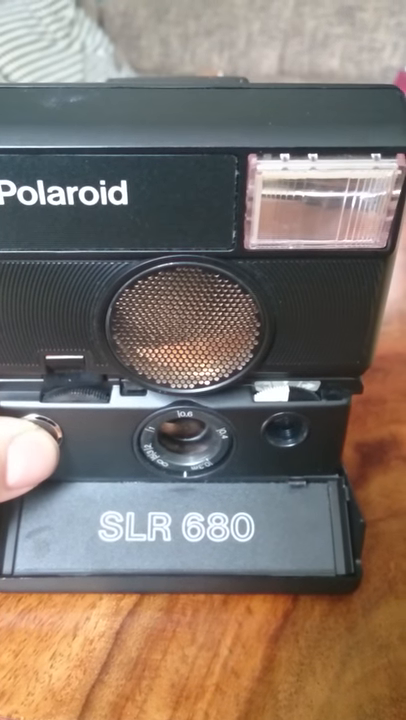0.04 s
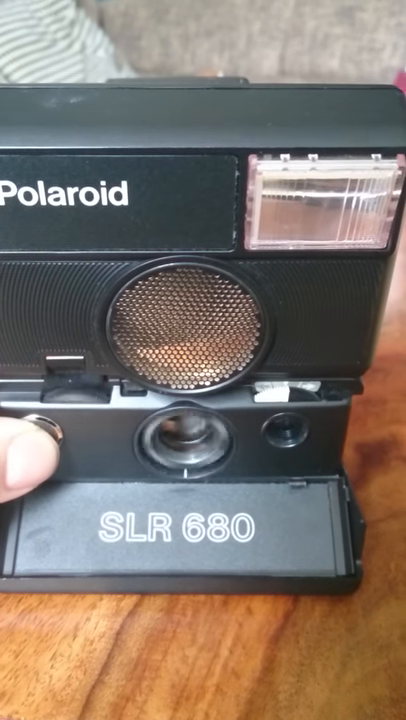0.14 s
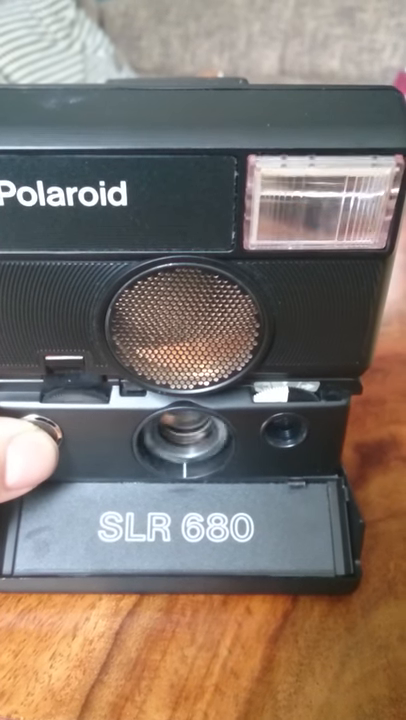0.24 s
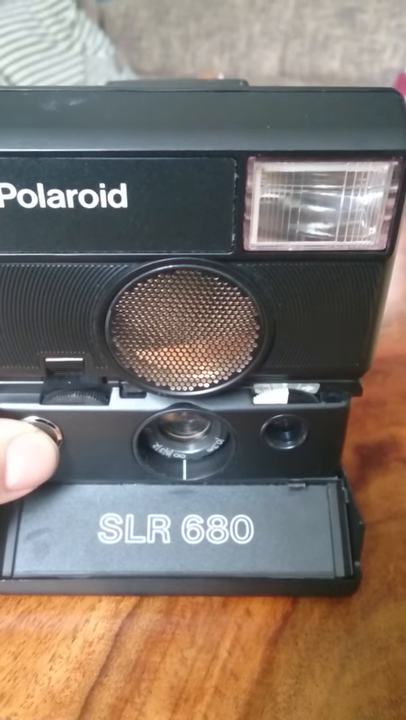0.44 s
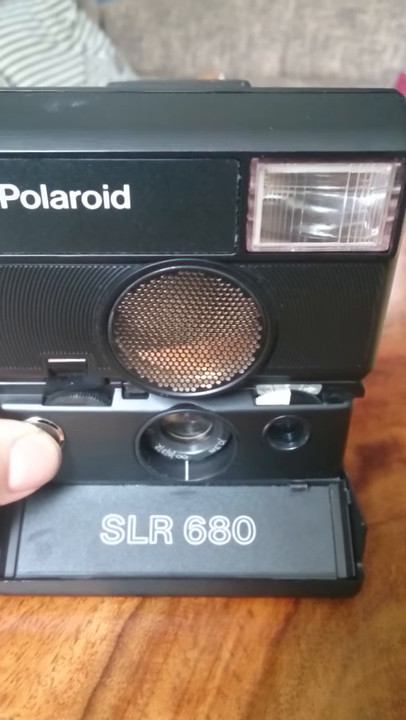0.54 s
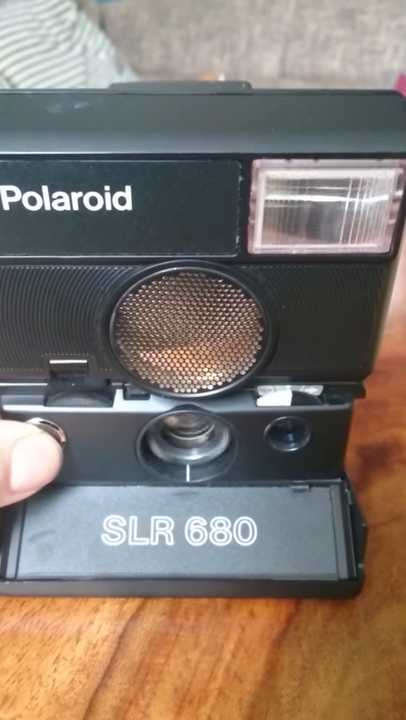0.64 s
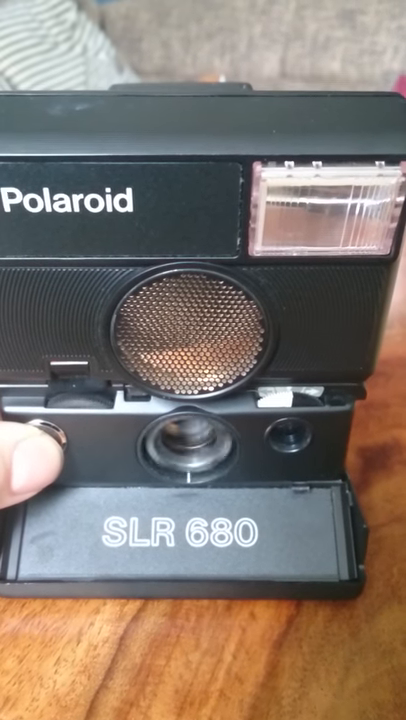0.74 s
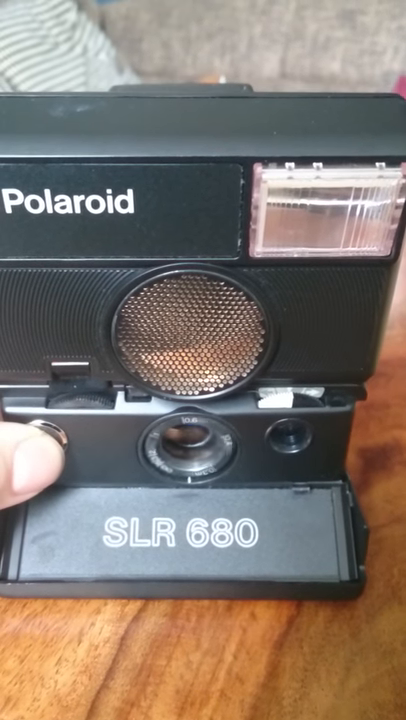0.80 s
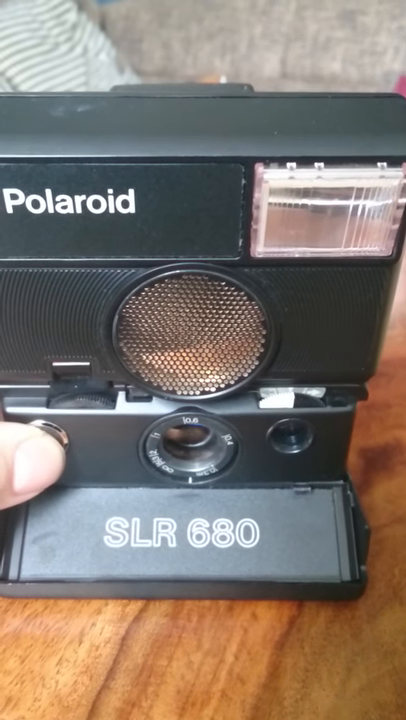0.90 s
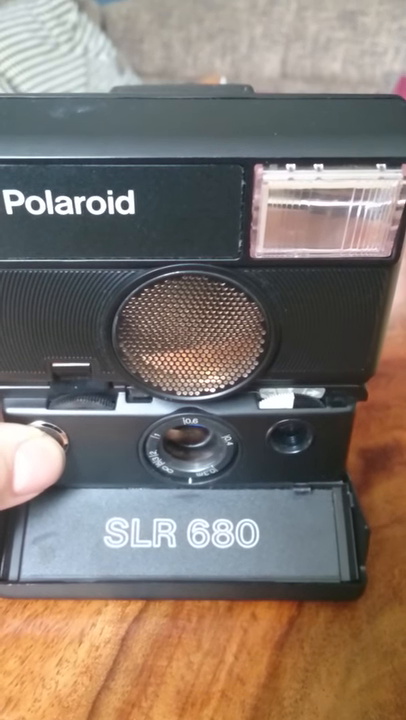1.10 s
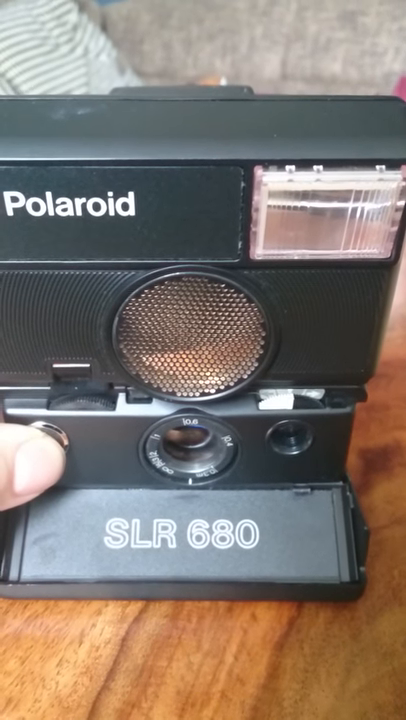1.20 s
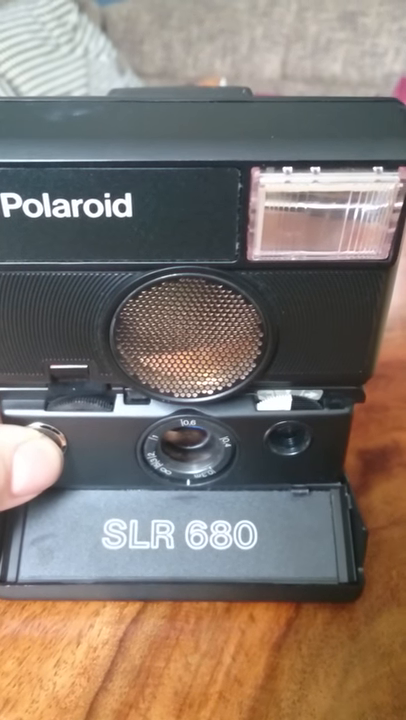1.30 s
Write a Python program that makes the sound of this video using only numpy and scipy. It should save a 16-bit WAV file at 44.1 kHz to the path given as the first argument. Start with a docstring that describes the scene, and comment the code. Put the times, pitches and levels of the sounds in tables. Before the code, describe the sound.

An instant camera's focus motor whirs twice, close by in a quiet room. After a very faint handling thump, the first rising, rattly whine runs from about 0.2 to 0.45 seconds, ending in clattering clicks and a faint ring. The shutter snaps at 0.65 seconds and the motor whirs back with two brief squeals. It stops with a sharp click at 0.9 seconds, followed by a small tick.

```python
"""A faint handling thump, then an instant camera's focus motor whirs the lens out and back, close by.
Meshing teeth make a rising whine over a rattle, and the gears squeal briefly on the way back.
Each run ends against a stop: the impact clatters, clicks and sets the case ringing in its modes.
The shutter snaps between the runs, and a quiet room answers with a short reverberation."""
import sys
import numpy as np
from scipy import signal
from scipy.fft import rfft, irfft, next_fast_len
from scipy.io import wavfile
from scipy.ndimage import map_coordinates

SR = 44100
rng = np.random.default_rng(int(sys.argv[2]) if len(sys.argv) > 2 else 0)


def int16_out(signal):
    """Quantize to a 16-bit WAV file."""
    q = np.round(np.clip(np.atleast_2d(signal).T, -1, 1) * 32767)
    wavfile.write(sys.argv[1], SR, q.astype(np.int16))


N = 59535
T = np.arange(N) / SR
SIDES = np.array([[.5], [-.5]])  # splits a difference between left and right
RUN_DOWN_S = 0.0078  # time constant of the stopping motor


def focus_motor():
    """A geared motor drives the lens out and back; its pitch is the rate at which teeth mesh."""
    # Each row: start and stop in seconds, rattle level in dB, rattle growth in dB per second.
    runs = [(.172, .452, -41, 10.5), (.645, .914, -43, -9)]
    # Motor speed, outward and back. Each row: time in seconds, tooth rate in Hz.
    speed_out = [(.172, 500), (.2, 880), (.245, 1035), (.29, 1108), (.325, 1132), (.385, 1126),
                 (.425, 1145)]
    speed_back = [(.645, 600), (.68, 850), (.735, 1000), (.76, 1075), (.8, 1113), (.835, 1152), (.87, 1150),
                  (.91, 1187)]
    # Rattle spectra, outward and back. Each row: frequency in Hz, relative density in dB.
    rattle_out = [(200, -40), (500, -30), (800, -10), (1100, -8.5), (1400, -8.5), (1800, -7.5), (2200, 1.5),
                  (2550, 0), (3000, 4.5), (4100, -7.5), (4900, -7.5), (5600, -1.5), (7000, -5), (8500, -10),
                  (13000, -16), (15300, -5.5)]
    rattle_back = [(200, -28), (500, -20.5), (800, -6), (1100, -1), (1400, -9), (1900, -7.5), (2400, -5),
                   (3050, 6.5), (3900, -7.5), (4900, -10.5), (5600, 4), (6300, -14), (7050, -0.5),
                   (8300, -12.5), (11500, -19.5), (15300, -12)]
    outward = gear_train(runs[0], speed_out, rattle_out, direction=0)
    return outward + gear_train(runs[1], speed_back, rattle_back, direction=1)


def gear_train(run, speed_curve, spectrum, direction):
    """Rattle and whine grow with speed, and each turn of the shaft modulates their amplitude."""
    start, stop = run[:2]
    flutter, sway_depth, teeth_per_turn, full_whine_hz = .004, 0.26, 12, 1157
    tooth_hz = np.interp(T, *np.transpose(speed_curve))
    speed = tooth_hz / tooth_hz.max()
    running = (T > start) * decay_after(stop, RUN_DOWN_S)
    teeth = np.cumsum(tooth_hz * (1 + flutter * wobble(170))) / SR
    shaft_angle = 2 * np.pi * teeth / teeth_per_turn
    sway = running * (1 + sway_depth * np.sin(shaft_angle))
    rattle = sway * speed ** 1.75 * tooth_rattle(teeth, run, spectrum)
    whine = sway * np.minimum(tooth_hz / full_whine_hz, 1) ** 9.7 * gear_whine(teeth, direction)
    whine *= decay_after(speed_curve[-1][0], RUN_DOWN_S)
    hum = amp(-76) * running * speed ** 2 * np.sin(4 * shaft_angle)
    return radiated(rattle, room_db=-4) + hum + whine + amp(-11.5) * room(whine)


def gear_whine(teeth, direction):
    """Periodic meshing gives harmonics; uneven tooth timing modulates their phase, blurring the top."""
    # Each row: harmonic number, outward and return levels in dB, left over right in dB,
    # left phase lead in radians.
    harmonics = [(1, -58, -54, 0, 4), (2, -37.5, -35, 0, 4.3), (3, -43.5, -46.5, 5.5, 6.9),
                 (4, -54, -59, 8, 9), (5, -52, -56, 13, 13.3), (6, -54, -57, 2, 15)]
    jitter_rad, flicker_db = 0.12, 3.3
    whine = np.zeros((2, N))
    for k, *levels, pan_db, lead in harmonics:
        phase = 2 * np.pi * k * teeth + jitter_rad * k * wobble(400) + lead * SIDES
        level_db = levels[direction] + flicker_db * wobble(60) + pan_db * SIDES
        whine += np.sqrt(2) * amp(level_db) * np.sin(phase)
    return whine


def tooth_rattle(teeth, run, spectrum):
    """Each tooth strikes with uneven force: a broadband impulse train over the noise of scraping."""
    # The gears catch. Each row: time in seconds, width in seconds, extra level in dB.
    catches = [(0.198, 0.016, 1), (0.273, 0.0036, 3), (0.421, 0.0021, 6), (0.674, 0.004, 0),
               (0.726, 0.0048, -1)]
    start, stop, rattle_db, growth_db_per_s = run
    scatter_db, scrape_db = 3, 1
    force = amp(scatter_db * rng.standard_normal(N).clip(-2, 2))
    ticks = np.diff(np.floor(teeth), prepend=0) * force * rng.choice([-1, 1], (3, N))
    scrape = amp(scrape_db) * rng.standard_normal((3, N))
    load_db = growth_db_per_s * (np.minimum(T, stop) - (start + stop) / 2)
    load_db += sum(db * bell(s, width) for s, width, db in catches)
    return amp(rattle_db + load_db) * coloured(unit(ticks) + scrape, spectrum)


def clicks():
    """Hard impacts at the latch and stops make small parts chatter in decaying bursts of noise."""
    # Each row: start in seconds, level in dB, rise and decay in seconds, tilt in dB per octave.
    contacts = [(.4348, -28.5, 0.0026, 0.0029, 3.5), (0.4425, -26.5, .001, 0.0029, 7),
                (0.449, -30, 0.0029, 0.0046, -3), (0.6395, -35, 0.00038, 0.0012, 2.5),
                (0.6486, -35.5, .002, 0.0031, -2.5), (.9134, -17, 0.0013, 0.0025, 0.5),
                (0.922, -39.5, 0.0034, 0.036, 1.5), (0.9894, -38, 0.0005, 0.0087, 6)]
    # Spectrum of the chatter. Each row: frequency in Hz, relative density in dB.
    spectrum = [(200, -71), (500, -29.5), (900, -8.5), (1600, -2.5), (2400, -1), (3300, 8.5), (4300, -6.5),
                (5600, 3), (7000, 3.5), (8500, -2), (10800, -11), (12700, -6), (15500, -5.5)]
    chatter = np.zeros((3, N))
    for s, db, rise, decay, tilt_db in contacts:
        envelope = np.clip((T - s) / rise, 0, 1) * decay_after(s + rise, decay)
        chatter += amp(db) * envelope * coloured(rng.standard_normal((3, N)), spectrum, tilt_db)
    return radiated(chatter, room_db=-10.5)


def shutter():
    """The blades snap in one dry knock; so short a pulse has a broad spectrum."""
    # Each row: frequency in Hz, width in seconds, level in dB.
    pulses = [(1821, .00018, -30.5), (800, 0.00013, -35.5)]
    snap_s, pan_db = .64155, -22.5  # left over right
    knock = low_cut(sum(push(snap_s, db, hz, width) for hz, width, db in pulses))
    return (direct(knock) + amp(-13) * room(knock)) * amp(pan_db * SIDES)


def squeaks():
    """The accelerating gears squeal in brief tones, roughened by random phase modulation."""
    # Each row: time in seconds, width in seconds, frequency in Hz, level in dB.
    squeals = [(0.673, 0.013, 2923, -39), (.722, 0.0083, 2880, -36)]
    direct_and_diffuse = np.zeros((3, N))
    for part in direct_and_diffuse:
        for s, width, hz, db in squeals:
            part += amp(db) * bell(s, width) * np.sin(2 * np.pi * hz * T + 0.84 * wobble(350))
    return radiated(direct_and_diffuse, room_db=-7)


def case_ring():
    """Struck as the lens hits a stop, the case vibrates freely in its damped modes."""
    # Each row: mode frequency in Hz, relative level in dB, time to fall 60 dB in seconds.
    modes = [(1020, 0, .29), (1505, -6, .24), (2250, -6, .2), (2680, -7, .15), (2880, -2, .17)]
    # Each row: time of impact in seconds, level in dB.
    stops = [(.447, -44.5), (0.912, -53)]
    rise_s = .001
    out = np.zeros(N)
    for s, db in stops:
        t = np.maximum(T - s, 0)
        for hz, level, t60 in modes:
            envelope = amp(db + level - 60 * t / t60) * (1 - np.exp(-t / rise_s))
            out += envelope * np.sin(2 * np.pi * hz * t + .3 * wobble(80))
    return out


def handling_thump():
    """A soft, slow push on the body holds only low frequencies."""
    return push(s=0.0637, db=-67.5, hz=75, width=0.015)


def radiated(direct_and_diffuse, room_db):
    """Direct sound reaches both sides, left first; diffuse sound, different on each side, widens it."""
    # Stereo balance. Each row: frequency in Hz, left over right in dB.
    balance = [(700, 2.5), (1290, 3.5), (2380, -5), (4400, 8), (8100, -0.5), (15000, 2)]
    pair = direct(direct_and_diffuse[0]) + amp(2) * direct_and_diffuse[1:]
    pair = filtered(pair, lambda hz: amp(along(balance, hz) * SIDES))
    pair = low_cut(low_cut(pair))
    return pair + amp(room_db) * room(pair)


def direct(x, lead_s=0.000458):
    """A shorter path brings the sound to the left microphone first."""
    return filtered(x, lambda hz: np.exp(2j * np.pi * hz * lead_s * SIDES))


def low_cut(x, cutoff_hz=420):
    """Parts much smaller than the wavelength radiate little bass."""
    return signal.sosfilt(signal.butter(2, cutoff_hz, "high", fs=SR, output="sos"), x)


def room(x):
    """Diffuse reflections form a noise tail whose treble dies soonest."""
    # Each row: frequency in Hz, reverberation time in seconds.
    t60 = [(300, 0.56), (1500, 0.44), (3000, 0.3), (7000, 0.29), (15000, 0.23)]
    hz, t, spectra = signal.stft(rng.standard_normal((2, SR // 2)), SR, nperseg=256)
    tail = signal.istft(spectra * amp(-60 * t / along(t60, hz)[:, None]), SR, nperseg=256)[1]
    tail *= 1 - np.exp(-np.arange(tail.shape[1]) / SR / 0.0016)  # the reflections build up
    tail /= np.linalg.norm(tail, axis=1, keepdims=True)
    return signal.fftconvolve(np.atleast_2d(x), tail, axes=1)[:, :N]


def noise_floor():
    """The quiet room is steady noise, strongest in the bass and uncorrelated between the sides."""
    # Each row: frequency in Hz, relative density in dB.
    spectrum = [(15, -46.5), (25, -14.5), (38, -15), (80, -8.5), (149, -19), (309, -22), (394, -19.5),
                (695, -24.5), (818, -25.5), (1740, -24), (5430, -31), (8830, -28.5), (16000, -43.5)]
    return amp(-69 + 0.71 * SIDES) * coloured(rng.standard_normal((2, N)), spectrum)


def amp(db):
    return 10 ** (np.asarray(db) / 20)


def unit(x):
    return x / np.sqrt(np.mean(x ** 2) + 1e-20)


def along(points, hz):
    """Interpolates (Hz, value) points on a logarithmic frequency axis."""
    f, v = np.transpose(points)
    return np.interp(np.log(hz + 1), np.log(f + 1), v)


def wobble(rate):
    """A smooth random curve with rate knots a second."""
    return map_coordinates(rng.standard_normal(int(N * rate / SR) + 4), [T * rate])


def filtered(x, response):
    """Multiplies the spectrum of x by a complex frequency response."""
    size = next_fast_len(N + SR // 2)
    return irfft(rfft(x, size) * response(np.fft.rfftfreq(size, 1 / SR)), size)[..., :N]


def coloured(x, points, tilt_db=0):
    """Shapes x by a spectrum and a tilt per octave above 500 Hz, at unit rms."""
    def gain(hz):
        return amp(along(points, hz) + tilt_db * np.log2(np.maximum(hz, 500) / 1000))
    return unit(filtered(x, gain))


def decay_after(s, time_constant):
    """Unity until s seconds, then exponential decay."""
    return np.exp(-np.maximum(T - s, 0) / time_constant)


def bell(s, width):
    """A Gaussian envelope centred at s seconds."""
    return np.exp(-.5 * ((T - s) / width) ** 2)


def push(s, db, hz, width):
    """A brief pressure pulse: a sine under a Gaussian envelope."""
    return amp(db) * bell(s, width) * np.sin(2 * np.pi * hz * (T - s))


def scene():
    """The pressures of the mechanism and the quiet room add by superposition."""
    sustained = focus_motor() + noise_floor()
    return sustained + squeaks() + clicks() + case_ring() + shutter() + handling_thump()


def record(dry, top_hz=15900):
    """A steep low-pass filter limits the bandwidth."""
    return filtered(dry, lambda hz: 1 / np.sqrt(1 + (hz / top_hz) ** 160))


dry = scene()
out = record(dry)
int16_out(out)
```